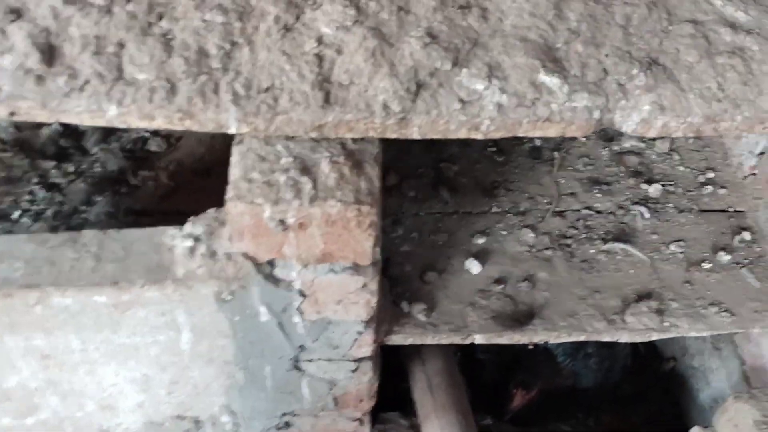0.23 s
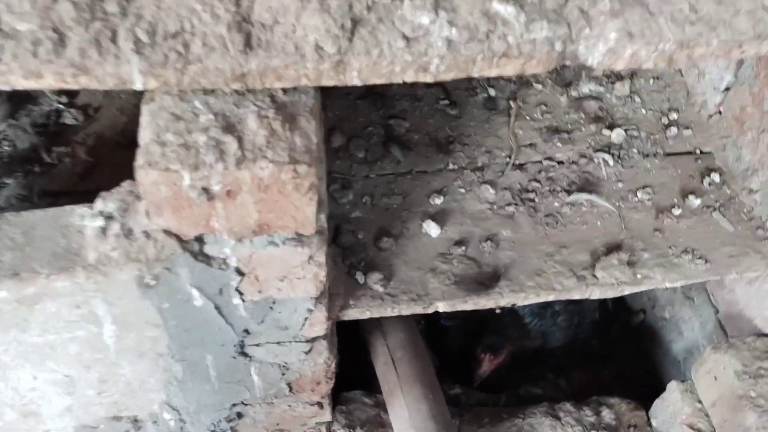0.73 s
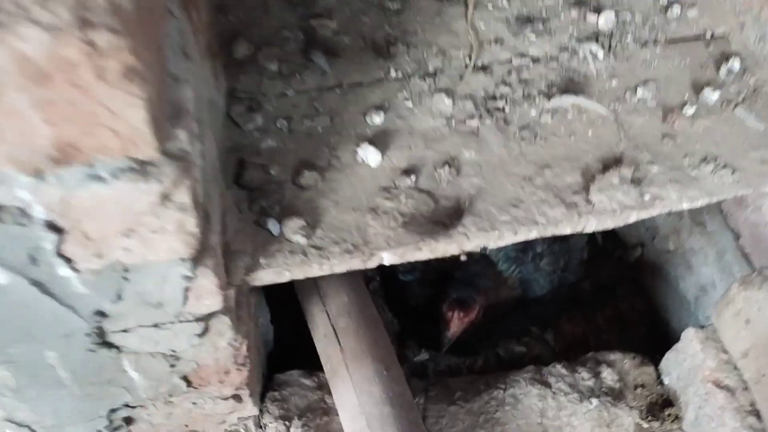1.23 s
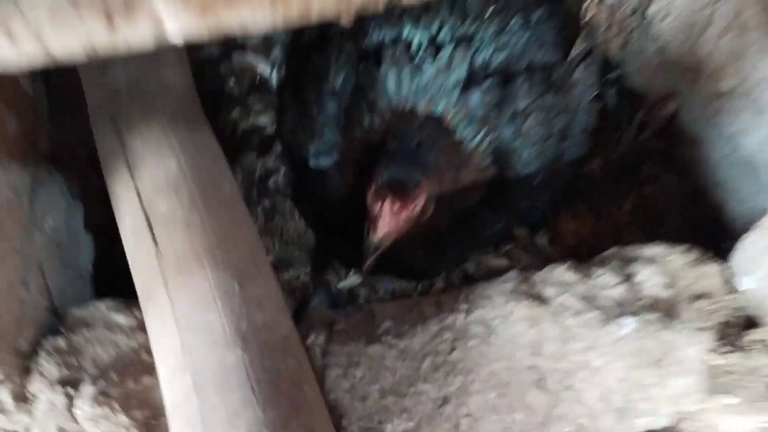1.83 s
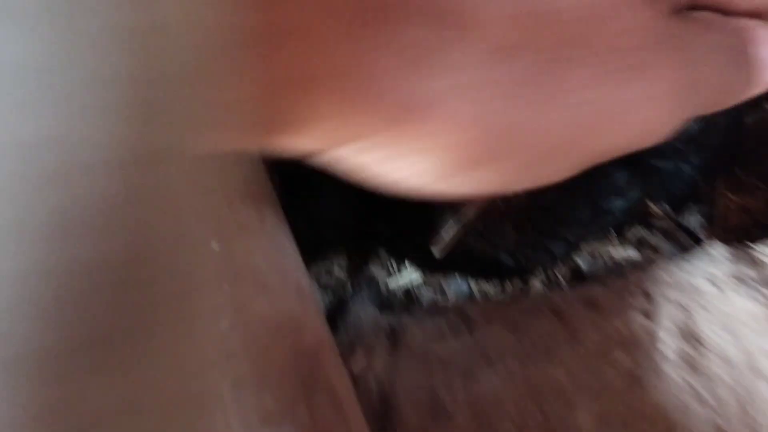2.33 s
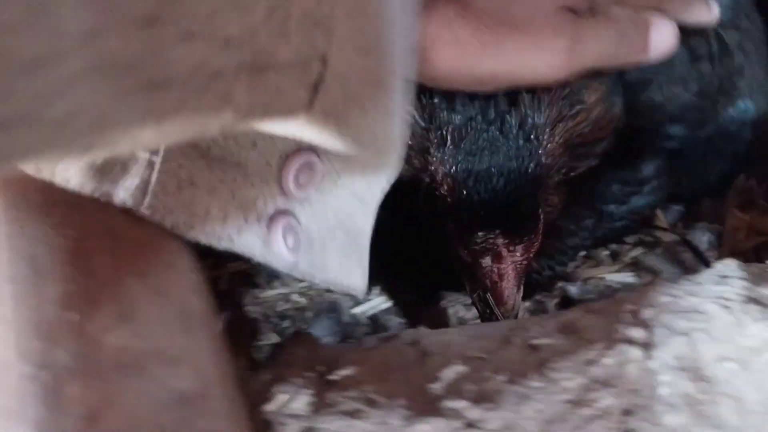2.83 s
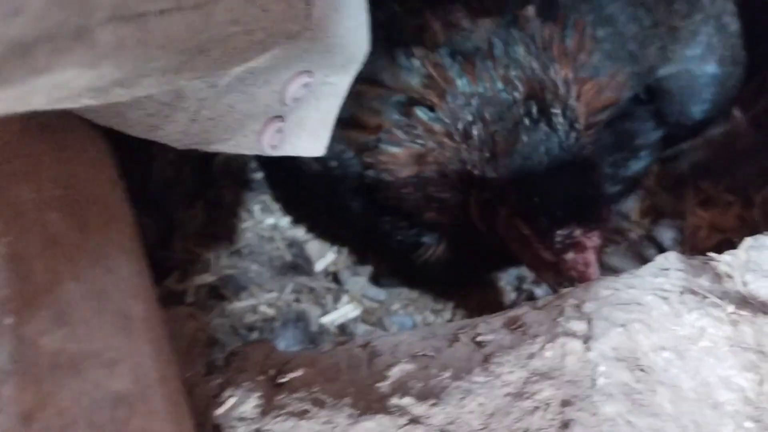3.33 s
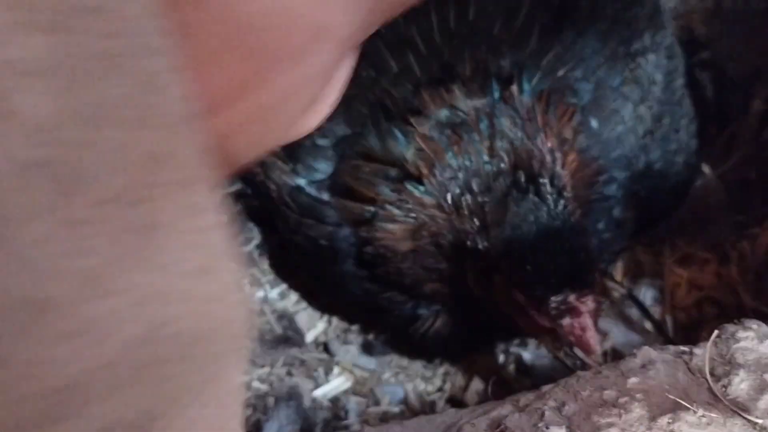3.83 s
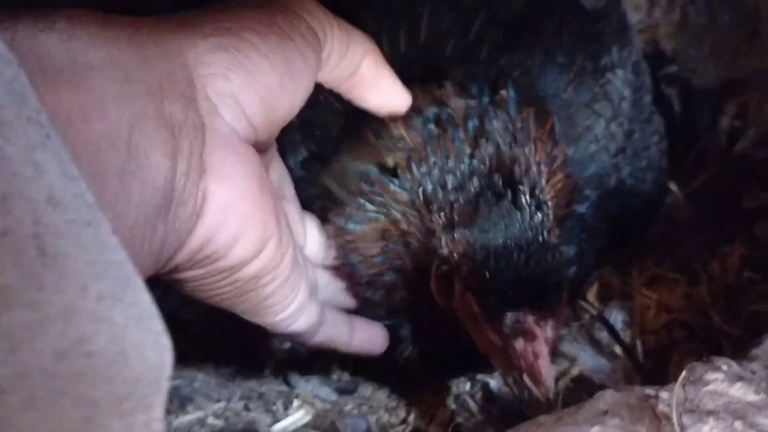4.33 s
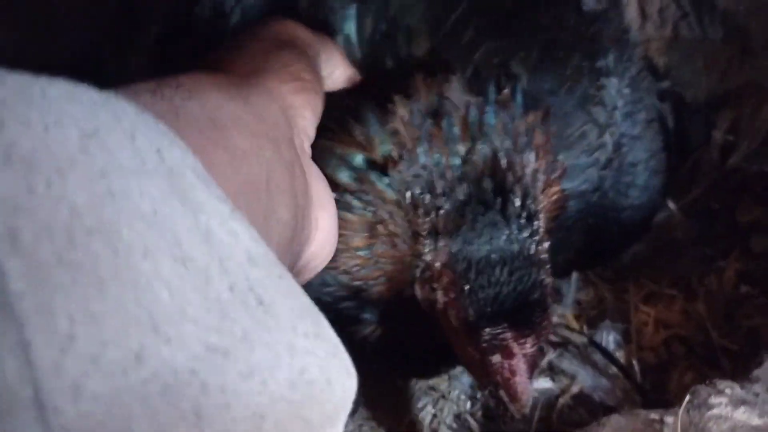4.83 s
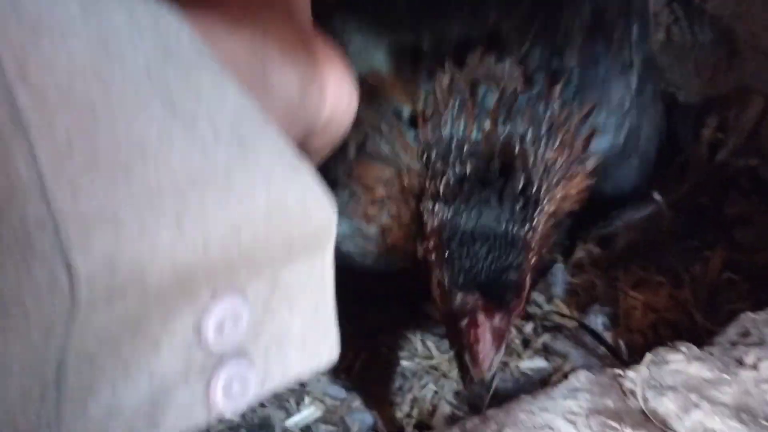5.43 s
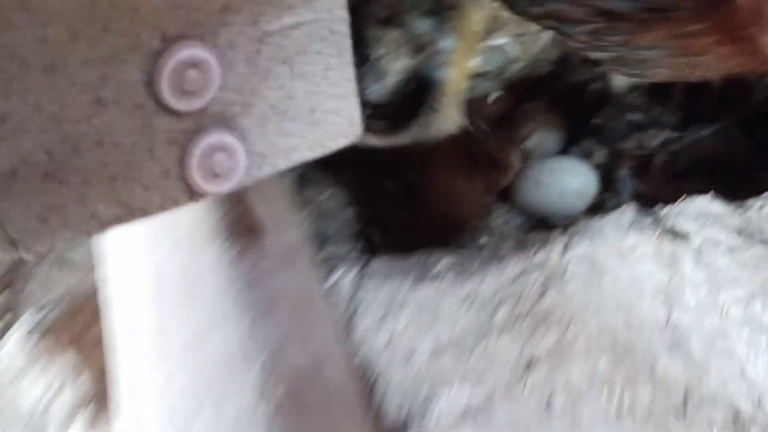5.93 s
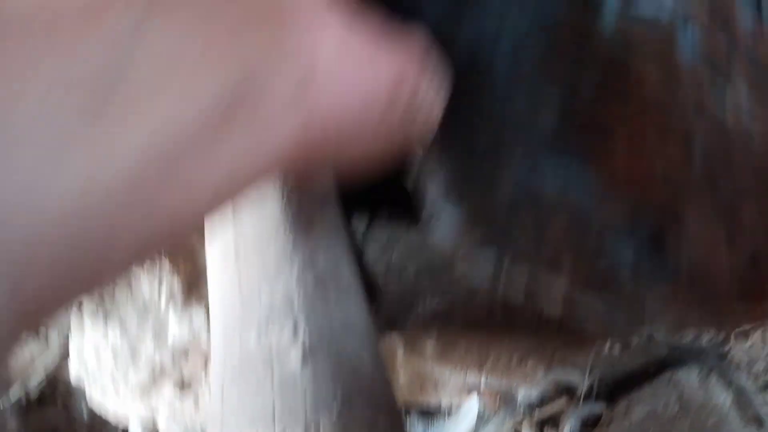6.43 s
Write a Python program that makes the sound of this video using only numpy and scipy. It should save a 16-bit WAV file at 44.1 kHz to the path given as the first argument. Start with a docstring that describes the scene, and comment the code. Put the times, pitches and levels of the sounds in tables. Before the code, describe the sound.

Quiet shed air and soft handling rumble. From 0 to 0.3 s a close hen gives a faint quavering grumble, around 900 Hz; a distant hen moans twice and peeps by 0.8 s. Dull scuffs and knocks on brick come at 0.85-1.4 s, as a thin trembling wail begins at 1.0. It swells from 1.5, holds near 1200-1300 Hz with little catches, peaks around 2.3-2.4 at 1400, then repeatedly cracks into a low, breathy, rasping squawk until 3.0. Bright two-part clucks strike at 3.16, 3.42 and 3.75, with straw snaps and rustle. Small clucks at 4.07 and 4.31 lead into a wavering growl to 4.7; lower clucks follow at 4.85 and 5.08. A wheezy growl swells from 5.3 to 5.9 as sleeve and straw drag loudly. Popping clucks at 6.03, 6.22 and 6.43 precede a final two-part cluck at 6.62. Close, dry stereo; loud calls duck the background.

```python
"""A brick nook in a shed: a hen on her nest gives a quavering grumble, a long wail breaking into a squawk,
then clucks and growls. Her voice is a harmonic tone whose pitch slips, with half-pitch lines when it roughens.
Shaped noise makes the reaching hand's rustle and rumble, scuffs, a dull throat pop, snaps and air;
a far hen is a wavering tone. The recorder's gain control ducks everything under loud calls."""
import sys
import numpy as np
from scipy import signal
from scipy.fft import rfft, irfft
from scipy.io import wavfile
from scipy.ndimage import uniform_filter1d, map_coordinates

SR = 44100
rng = np.random.default_rng(int(sys.argv[2]) if len(sys.argv) > 2 else 0)


def wav_out(sig):
    """Save sig, one row per channel (or a flat mono array), as 16-bit PCM at SR to the path in sys.argv[1]."""
    wavfile.write(sys.argv[1], SR, np.round(np.clip(np.atleast_2d(sig).T, -1, 1) * 32767).astype(np.int16))


N = 295029
TIME_S = np.arange(N) / SR

# Still air of the shed. Each row: frequency in Hz, relative level in dB.
AIR_SPECTRUM = [(40, -11.5), (100, 1), (250, -14), (700, -7.5), (1500, -39), (3300, -26.5), (4400, -47),
                (5500, -27), (8000, -33.5), (15000, -42)]
# Far fowl, two moans and a peep. Each row: start in seconds, length in seconds, pitch in Hz, level in dB
# before the far trim, fade over the call in dB.
FAR_CALL_ROWS = [(0.267, 0.24, 566, -42, 32.5), (0.477, 0.13, 537, -49.5, 7), (0.69, 0.16, 3255, -56.5, 17)]
# Far hen's throat. Each row: frequency in Hz, relative level in dB.
FAR_THROAT_SPECTRUM = [(500, 2), (1100, 12), (1650, -0.5), (2200, 4.5), (2800, -8), (3500, -4), (5000, -58),
                       (9000, -70)]
# Hand shifting on the microphone case. Each row: time in seconds, level in dB before the trim.
RUMBLE_LEVEL = [(0, -64), (.25, -53), (.9, -61.5), (1.5, -70), (2.1, -52), (2.8, -54.5), (3.08, -40.5),
                (4.25, -45), (5.1, -44), (6.69, -50)]
# Case rumble. Each row: frequency in Hz, relative level in dB.
RUMBLE_SPECTRUM = [(15, -59), (25, -29.5), (91, 2.5), (113, 8), (195, -2.5), (350, -14), (435, -4),
                   (565, -23), (793, -17.5), (912, -34), (1000, -49.5), (1300, -72.5), (2200, -120)]
# Sleeve dragging over the ledge as the hen is lifted. Each row: time in seconds, level in dB.
DRAG_LEVEL = [(5.3, -81), (5.7, -38), (5.97, -32.5), (6.25, -38.5), (6.69, -35.5)]
# Sleeve drag. Each row: frequency in Hz, relative level in dB.
DRAG_SPECTRUM = [(30, -54), (60, -23), (130, -1.5), (200, -2.5), (300, -9.5), (450, -10.5), (900, -34.5),
                 (3000, -73.5)]
# Scuffs and knocks on brick; the last row is a dull throat pop before the final cluck.
# Each row: start in seconds, level in dB, 60 dB decay in seconds, centre in Hz.
DULL_BURST_ROWS = [(0.2, -48, .04, 900), (0.846, -43, 0.18, 580), (0.923, -41, 0.72, 780),
                   (0.949, -32, 0.11, 806), (0.976, -37.5, 0.18, 500), (1.167, -43.5, 0.17, 700),
                   (1.193, -30.5, 0.15, 594), (1.384, -27, 0.021, 1610), (2.07, -29.5, 0.45, 710),
                   (6.591, -25, 0.026, 700)]
# Straws snapping. Each row: start in seconds, level in dB before the trim.
SNAP_ROWS = [(1.112, -31.5), (1.2887, -27.5), (1.3334, -26.5), (1.6084, -30), (2.7748, -21), (3.418, -41),
             (3.8144, -21), (4.048, -26)]
# Sleeve and feathers brushing straw. Each row: time in seconds, level in dB before the trim.
RUSTLE_LEVEL = [(0, -97), (.9, -76), (1.55, -59.5), (2.3, -64), (2.7, -47), (3.15, -57), (3.66, -54),
                (3.86, -50), (4.02, -57), (4.14, -74.5), (4.45, -71), (4.62, -59.5), (4.72, -55.5),
                (5.1, -70.5), (5.5, -60), (5.62, -46), (5.84, -41.5), (6.1, -51.5), (6.69, -55)]
# Rustle. Each row: frequency in Hz, relative level in dB.
RUSTLE_SPECTRUM = [(60, -35.5), (130, -15.5), (200, -5.5), (300, -8), (420, -7.5), (580, -14), (780, -7.5),
                   (1100, -10.5), (1500, -11.5), (2000, -6.5), (2700, -7.5), (3700, -9.5), (5200, -10.5),
                   (7700, -18), (10300, -25.5), (15000, -31.5)]
# Nook reverberation. Each row: frequency in Hz, 60 dB decay in seconds.
NOOK_T60 = [(200, 0.35), (1000, 0.25), (4000, 0.23), (12000, 0.027)]
# Hen before the microphone. Each row: time in seconds, lag of the left port in ms,
# left minus right in dB below the split, lag of the left port in the treble in ms.
HEN_PLACE = [(.1, .03, -1.6, .08), (1.1, .13, 0, .07), (1.7, .14, -1, .08), (2.0, .26, .3, .3),
             (2.6, .25, -.3, .3), (2.9, .2, -3.4, .29), (3.45, .24, -5.3, .31), (4.5, .31, -4.3, .34),
             (5.75, .29, -2.4, .28), (6.25, .11, -3, .13), (6.64, -.05, -1.3, .11)]
# Air hissing through the open beak. Each row: time in seconds, level in dB.
HISS_LEVEL = [(.25, -59), (.4, -62), (.9, -66), (1.0, -55), (1.48, -31), (1.8, -44), (2.48, -39),
              (2.64, -29), (2.94, -20), (3.03, -80)]
# Beak hiss. Each row: frequency in Hz, relative level in dB.
HISS_SPECTRUM = [(500, -45.5), (1100, -2.5), (1700, 13), (2400, -1.5), (3100, 0.5), (3900, -7), (4800, -4),
                 (7000, -22.5), (10000, -50.5), (15000, -49)]
# Wheeze of the low growl. Each row: time in seconds, level in dB.
WHEEZE_LEVEL = [(5.25, -89), (5.45, -44), (5.6, -25.5), (5.88, -16.5), (5.93, -70)]
# Wheeze. Each row: frequency in Hz, relative level in dB.
WHEEZE_SPECTRUM = [(600, -21.5), (1200, 8.5), (1700, -3), (2000, -33), (2900, -23), (3500, -5.5),
                   (4100, -25.5), (8000, -37.5)]
# Throat popping open. Each row: start in seconds, peak in dB before the trim, length in seconds.
POP_ROWS = [(3.142, -34, 0.0075), (3.395, -23, 0.0056), (3.714, -20, 0.0052), (4.049, -20.5, 0.015),
            (4.285, -30.5, 0.0065), (4.82, -24.5, 0.013), (5.059, -22, 0.015), (5.26, -31, 0.0052),
            (6.012, -7.5, 0.011), (6.195, -21, 0.006), (6.408, -18.5, 0.007)]
# Throat and beak. Each row: frequency in Hz, relative level in dB.
THROAT_SPECTRUM = [(800, 25), (1250, 32.5), (1700, 6.5), (2050, 17.5), (2450, 4), (3100, -12), (3800, 1.5),
                   (4300, -15.5), (5200, -12.5), (6800, -28), (8500, -33), (12000, -67.5)]
# Catches in the voice. Each row: centre in seconds, half length to 1/e in seconds,
# pitch drop as a share, level change in dB.
VOICE_SLIPS = [(1.062, 0.0067, 0.2, 16), (1.119, .008, 0.19, 17), (1.241, 0.0062, .09, 9),
               (1.294, 0.0087, .11, 13.5), (1.345, .012, .06, 15), (1.421, .007, .28, -1.5),
               (1.822, 0.0043, .12, -4), (2.048, 0.0056, 0.12, 1.5), (2.181, 0.0033, .2, -3.5),
               (2.198, .005, .24, -4.5), (2.785, 0.0027, .16, -1), (2.837, 0.0052, .28, 2),
               (2.853, 0.0047, 0.22, 6), (3.274, .009, 0.37, -5.5), (3.509, .004, 0.056, -3.5),
               (3.237, .007, 0.14, -8), (3.798, 0.0046, 0.12, 0), (4.368, 0.0043, 0.17, 2),
               (6.667, .005, 0.12, -11), (4.403, .009, .05, -28.5), (4.453, .007, 0.078, -39),
               (4.504, 0.0055, 0.057, -17.5), (4.583, 0.0045, 0.074, -10), (5.382, .0056, .4, 3.5),
               (5.43, .005, 0.64, -5.5)]
# Growls, long and short. Each row: start in seconds, length in seconds, pitch in Hz, starting level in dB,
# swell in dB, closing sag in seconds, quaver as a share of the pitch, undertone in dB, rasp in dB, overtones in dB.
GROWL_ROWS = [(0, 0.31, 909, -34, -4, .22, .12, -32, -21.5, -26.5),
              (4.366, 0.31, 911, -7.5, -6.5, .11, 0.083, -30.5, -29, -38),
              (5.34, 0.054, 910, -17.5, 5, .04, .08, -28, -22, -21.5),
              (5.389, 0.074, 880, -15, -7, 0.037, 0.077, -22, -16, -33),
              (5.451, .465, 871, -14.5, 11, 0.04, 0.035, -9, -16, -23),
              (6.237, 0.069, 838, -9, -4, .045, 0.052, -11, -17, -24)]
# Short clucks. Each row: start in seconds, length in seconds, landing pitch in Hz, level in dB, undertone in dB.
CLUCK_ROWS = [(4.069, .028, 520, -23.5, -14), (4.313, 0.026, 570, -15, -26),
              (4.849, 0.032, 444, -11.5, -16), (5.084, 0.031, 434, -14.5, -24),
              (5.286, 0.036, 873, -13, -9.5), (6.03, 0.033, 434, -6.5, -31.5),
              (6.221, 0.028, 850, -10, -18.5), (6.429, 0.041, 410.5, -11.5, -19)]
# Two-part clucks. Each row: start in seconds, note length in seconds, top pitch in Hz, mid-note level in dB,
# pause in seconds, tail length in seconds, tail level in dB.
BAWK_ROWS = [(3.164, 0.045, 1112, -3.5, 0.0011, 0.077, -12.5), (3.423, 0.045, 1113, 0, 0.0069, 0.081, -9.5),
             (3.746, .03, 1015, -2, 0.02, .085, -12), (6.62, 0.034, 944.4, -1, 0, .08, -7)]
# Long wail. Each row: time in seconds, pitch in Hz, level in dB, overtones in dB, quaver as a share of the pitch.
WAIL_PATH = [(1.0, 896, -35, -16, 0.045), (1.05, 1309, -41, -21, .055), (1.17, 1212, -33.5, -13, 0.068),
             (1.28, 1423, -32.5, -19.5, 0.035), (1.41, 1037, -27.5, -20.5, .06),
             (1.52, 1269, -20.5, -19, .05), (1.64, 1317, -13, -19.5, 0.013),
             (1.79, 1245, -10, -17.5, 0.011), (1.85, 1158, -20.5, -10, .035),
             (1.94, 1267, -12, -19, 0.0036), (2.01, 1213, -19.5, -13, 0.033),
             (2.05, 1203, -13.5, -14.5, 0.019), (2.23, 1224, -9.5, -22.5, 0.018),
             (2.33, 1415, 0, -17.5, 0.0081), (2.42, 1323, 1, -29, 0.0097), (2.54, 1205, -6, -13, .085),
             (2.68, 1178, -0.5, -31, .03), (2.77, 1230, -1, -23.5, 0.021), (2.83, 1381, -3.5, -14.5, 0.036)]
# Lopsided vibration in the wail. Each row: time in seconds, even against odd harmonics in dB.
WAIL_LOPSIDED = [(1.0, -11), (1.65, -12.5), (1.9, 1), (2.33, 0), (2.5, -2)]
# Wail breaking into a squawk. Each row: start in seconds, length in seconds, starting pitch in Hz,
# starting level in dB, rasp between the harmonics in dB.
WAIL_BREAKS = [(2.554, 0.052, 820, -3.5, 14.5), (2.617, .04, 783.6, -8, -17.5),
               (2.691, .062, 802, -6.5, -0.5), (2.864, 0.12, 847.6, 0.5, -18.5),
               (2.975, .034, 731, -8.5, 0)]


def amp(db):
    """Decibels to gain."""
    return 10 ** (np.asarray(db) / 20)


def unit(x):
    """Scales to rms 1."""
    return x / np.sqrt(np.mean(x ** 2) + 1e-20)


def read(points, hz):
    """Interpolates a spectrum on a log-frequency axis."""
    f, value = np.transpose(points)
    return np.interp(np.log(hz + 1), np.log(f + 1), value)


def follow(rows, t):
    """Each column of a curve at the times t."""
    s, *columns = np.transpose(rows)
    return [np.interp(t, s, c) for c in columns]


def level_gain(rows, trim_db=0):
    """Gain over the whole scene from a level curve."""
    return amp(follow(rows, TIME_S)[0] + trim_db)


def add(mix, s, sound):
    """Mixes a sound in at s seconds."""
    part = mix[..., max(round(s * SR), 0):][..., :sound.shape[-1]]
    part += sound[..., :part.shape[-1]]


def span(s, length_s):
    """Times from the start of a note, cut at the scene's end."""
    return np.arange(min(round(length_s * SR), N - round(s * SR))) / SR


def colour(x, points):
    """Filters by a spectrum; rms 1."""
    gains = amp(read(points, np.fft.rfftfreq(N, 1 / SR)))
    return unit(irfft(rfft(x) * gains, N))


def wobble(hz, octaves=.6):
    """Random motion at about hz cycles a second; rms 1."""
    f = np.fft.rfftfreq(N, 1 / SR) + 1e-3
    band = np.exp(-.5 * (np.log2(f / hz) / octaves) ** 2)
    return unit(irfft(rfft(rng.standard_normal(N)) * band, N))


def pair(x, likeness):
    """Two unrelated signals become a partly alike left and right."""
    c = np.clip(likeness, 0, 1)
    return np.array([x[0], c * x[0] + np.sqrt(1 - c ** 2) * x[1]])


def still_air(level_db=-60, likeness=0.64):
    """Steady coloured noise, partly alike at both ports."""
    return amp(level_db) * colour(pair(rng.standard_normal((2, N)), likeness), AIR_SPECTRUM)


def far_hen(waver=0.037, waver_hz=29.6):
    """Eight throat-shaped harmonics on a wavering pitch."""
    out, k = np.zeros(N), np.arange(1, 9)[:, None]
    bend = 1 + waver * wobble(waver_hz)
    for s, length_s, hz, top_db, fade_db in FAR_CALL_ROWS:
        t = s + span(s, length_s)
        db = top_db - fade_db * (t - s) / length_s
        phase = 2 * np.pi * np.cumsum(hz * np.interp(t, TIME_S, bend)) / SR
        gains = amp(read(FAR_THROAT_SPECTRUM, k * hz))
        wave = (gains * np.sin(k * phase)).sum(0)
        add(out, t[0], unit(wave) * amp(db) * signal.windows.tukey(len(t), .2))
    return out


def rumble(grip_trim_db=3, likeness=0.94):
    """Low noise of the grip and the dragging sleeve, nearly the same at both ports."""
    grip, cloth = (pair(rng.standard_normal((2, N)), likeness) for _ in range(2))
    grip = colour(grip, RUMBLE_SPECTRUM) * level_gain(RUMBLE_LEVEL, grip_trim_db)
    return grip + colour(cloth, DRAG_SPECTRUM) * level_gain(DRAG_LEVEL)


def dull_bursts(spread=1.32, lowpass_hz=3500, likeness=0.76):
    """Dull, decaying noise bursts: scuffs and knocks on brick, then one throat pop."""
    out = np.zeros((2, N))
    for s, db, decay_s, hz in DULL_BURST_ROWS:
        t = np.arange(0, decay_s, 1 / SR)
        band = signal.butter(1, [hz / spread, hz * spread], "band", fs=SR)
        burst = signal.lfilter(*band, pair(rng.standard_normal((2, SR)), likeness))
        burst = unit(signal.lfilter(*signal.butter(1, lowpass_hz, fs=SR), burst))[:, :len(t)]
        add(out, s, burst * amp(db - 60 * t / decay_s))
    return out


def snaps(trim_db=-4, decay_s=0.0098, highpass_hz=3000):
    """Each dry straw breaks with a bright tick of noise, 60 dB down after decay_s."""
    out, t = np.zeros((2, N)), np.arange(SR // 20) / SR
    for s, db in SNAP_ROWS:
        tick = signal.lfilter(*signal.butter(2, highpass_hz, "high", fs=SR), rng.standard_normal((2, len(t))))
        add(out, s, tick * amp(db + trim_db - 60 * t / decay_s))
    return out


def patchy(x, depth_db=3):
    """The colour shifts as different straws and folds of cloth take the load."""
    z = signal.stft(x, SR, nperseg=512)[2]
    patches = uniform_filter1d(rng.standard_normal(z.shape[1:]), size=9, axis=0)
    patches = unit(uniform_filter1d(patches, size=14, axis=1))
    return unit(signal.istft(z * amp(depth_db * patches), SR, nperseg=512)[1][:, :N])


def rustle(trim_db=14, grain_db=2.5, grains_per_s=2500, rub_db=-3, likeness=0.29):
    """Many tiny straw cracks over the smooth rub of cloth."""
    sizes = amp(grain_db * np.minimum(rng.exponential(1, (2, N)), 5))
    grains = sizes * (rng.random((2, N)) < grains_per_s / SR)
    cracks = unit(grains * rng.choice([-1, 1], (2, N)))
    drive = cracks + amp(rub_db) * rng.standard_normal((2, N))
    return colour(patchy(pair(drive, likeness)), RUSTLE_SPECTRUM) * level_gain(RUSTLE_LEVEL, trim_db)


def nook(x):
    """A short, dense noise tail off the close brick walls, decaying by frequency."""
    taps = rng.standard_normal((2, SR // 3)) * (np.arange(SR // 3) > SR // 250)  # 4 ms gap
    hz, t, z = signal.stft(taps, SR, nperseg=256)
    echoes = signal.istft(z * amp(-60 * t / read(NOOK_T60, hz)[:, None]), SR, nperseg=256)[1]
    return signal.fftconvolve(x[None], echoes / np.linalg.norm(echoes[0]), axes=1)[:, :N]


def ports(x, split_hz=1750):
    """Sound reaches the two ports at different times; the nook also makes the low tone stronger on one side."""
    low = signal.sosfiltfilt(signal.butter(4, split_hz, fs=SR, output="sos"), x)
    lag_ms, balance_db, treble_lag_ms = follow(HEN_PLACE, TIME_S)
    out = np.zeros((2, N))
    for band, band_lag_ms, tilt_db in (low, lag_ms, balance_db), (x - low, treble_lag_ms, 0):
        shift = band_lag_ms * SR / 2000  # half the lag on each side, in samples
        out += [map_coordinates(band, [np.arange(N) - side * shift], order=3) * amp(side * tilt_db / 2)
                for side in (1, -1)]
    return out


def hiss(tone, flutter_db=2, flutter_hz=37, gating=0.64):
    """Turbulent air escapes in puffs, in step with the tone."""
    puffs = 1 + gating * np.cos(np.angle(signal.hilbert(tone)))
    beak, wheeze = rng.standard_normal((2, N)) * puffs * amp(flutter_db * wobble(flutter_hz))
    return (colour(beak, HISS_SPECTRUM) * level_gain(HISS_LEVEL)
            + colour(wheeze, WHEEZE_SPECTRUM) * level_gain(WHEEZE_LEVEL))


def pops(start_hz=400, end_hz=1000, trim_db=5, rise_s=0.00069, damping=1.4):
    """A few cycles that sweep upward as the throat opens."""
    out = np.zeros(N)
    for s, db, length_s in POP_ROWS:
        t = np.arange(0, length_s, 1 / SR)
        phase = 2 * np.pi * np.cumsum(start_hz + (end_hz - start_hz) * t / length_s) / SR
        edges = np.minimum(t / rise_s, 1) * np.minimum((length_s - t) / rise_s, 1)
        shape = edges * np.exp(-damping * t / length_s)
        add(out, s, amp(db + trim_db) * shape / shape.max() * np.sin(phase))
    return out


def unsteadiness(quaver_per_s=55, quaver_wander=.22):
    """What all calls share: a quaver made of quick dips, fine jitter, flutter, grit and scattered cycle timing."""
    turns = np.cumsum(quaver_per_s * (1 + quaver_wander * wobble(25))) / SR
    dips = np.cos(np.pi * turns) ** 4
    return np.array([unit(dips - dips.mean()), wobble(220), wobble(50), wobble(200), wobble(130, 1)])


def reed(shake, s, hz, level_db, quaver, over_db, under_db, half_db, even_db, fade_s=.003,
         jitter_share=.0015, jitter_per_quaver=.15,
         flutter_db_per_quaver=63, flutter_max_db=4, grit_db_per_quaver=5):
    """A tone, throat-shaped harmonics, and half lines where the cycles alternate and lose their timing."""
    t = s + np.arange(len(hz)) / SR
    dips, jitter, flutter, grit, scatter = shake[:, max(round(s * SR), 0):][:, :len(t)]
    hz = hz * (1 - quaver * dips + (jitter_share + jitter_per_quaver * quaver) * jitter)
    flutter_db = np.minimum(flutter_db_per_quaver * quaver, flutter_max_db) * flutter
    level_db = level_db + flutter_db + grit_db_per_quaver * quaver * grit
    for at_s, half_s, drop, change_db in VOICE_SLIPS:
        slip = np.exp(-np.minimum(((t - at_s) / half_s) ** 2, 20))
        hz, level_db = hz * (1 - drop * slip), level_db + change_db * slip
    phase = 2 * np.pi * np.cumsum(hz) / SR
    phase = phase + .22 * np.minimum(amp(half_db + 6), 1) * scatter  # radians

    k = np.arange(2, 11)[:, None]
    gains = amp(read(THROAT_SPECTRUM, k * hz) + even_db * (k % 2 == 0))
    overtones = (gains * np.cos(k * phase)).sum(0) / np.linalg.norm(gains, axis=0)
    gains = amp(read(THROAT_SPECTRUM, (k - .5) * hz) - 8.9 * np.log2(k - 1))
    rasp = (gains * np.cos((k - .5) * phase)).sum(0) / np.linalg.norm(gains, axis=0)

    shares = amp(np.broadcast_arrays(0 * t, over_db, under_db, half_db))
    parts = [np.sin(phase), overtones, np.sin(phase / 2), rasp]
    wave = (shares * parts).sum(0) / np.linalg.norm(shares, axis=0)
    fade = np.clip(np.minimum(t - s, t[-1] - t) / fade_s, 0, 1)
    return s, np.sqrt(2) * wave * fade * amp(level_db)


def growl(shake, s, length_s, hz, db, swell_db, sag_s, quaver, under_db, rasp_db, over_db,
          closing_db=9, sag_share=.2, drift_share=0.015):
    """A quavering note that drifts, then sags and roughens as the throat closes."""
    t = span(s, length_s)
    closing = np.clip(1 - (length_s - t) / sag_s, 0, 1)
    rough_db = closing_db * closing
    drift = drift_share * wobble(9)[:len(t)]
    return reed(shake, s, hz * (1 + drift - sag_share * closing), db + swell_db * t / length_s, quaver,
                over_db + rough_db, under_db + rough_db, rasp_db + rough_db, even_db=28, fade_s=0.017)


def cluck(shake, s, length_s, landing_hz, db, under_db, top_hz=1499, fall_s=0.018, rise_s=0.0097, rise_db=24.5):
    """The pitch plunges to its landing note while the sound swells."""
    t = span(s, length_s)
    hz = np.maximum(top_hz * np.exp(-t / fall_s), landing_hz)
    opening = np.minimum(t / rise_s, 1)
    return reed(shake, s, hz, db - rise_db * (1 - opening), quaver=0.046, over_db=-3 - 17.3 * np.log2(hz / 420),
                under_db=under_db, half_db=-14, even_db=12.5, fade_s=0.0065)


def clear_note(shake, s, length_s, hz, db, peak_share=0.33, arch=0.38, swell_db=7.5):
    """First part of a two-part cluck: a nearly pure tone that arches in pitch and swells."""
    u = span(s, length_s) / length_s
    return reed(shake, s, hz * (1 - arch * (u - peak_share) ** 2), db + swell_db * (u - .5), quaver=0.013,
                over_db=-24.5, under_db=-49.5, half_db=-47, even_db=-5.5, fade_s=0.0036)


def tail(shake, s, length_s, db, start_hz=850, sag_hz_per_s=430, quaver=0.094, roughening_db=10):
    """Second part of a two-part cluck: quavering, and rougher as it sinks."""
    t = span(s, length_s)
    rough_db = roughening_db * t / length_s
    return reed(shake, s, start_hz - sag_hz_per_s * t, db, quaver,
                over_db=rough_db - 29.5, under_db=rough_db - 46, half_db=rough_db - 29, even_db=4, fade_s=0.0015)


def wail(shake, under_db=-54, rasp_db=-41, break_under_db=-27, blend_s=0.012, sag_hz_per_s=880,
         fade_db_per_s=107, break_over_db=2, dulling_db_per_s=116.5, break_quaver=.024):
    """A long high call; toward its end it keeps dropping into the low register, where it sags and dulls."""
    s = WAIL_PATH[0][0]
    t = s + span(s, WAIL_BREAKS[-1][0] + WAIL_BREAKS[-1][1] - s)
    hz, level_db, over_db, quaver = follow(WAIL_PATH, t)
    state = np.array(np.broadcast_arrays(hz, level_db, quaver, over_db, under_db, rasp_db))
    for start_s, length_s, low_hz, db, harsh_db in WAIL_BREAKS:
        age_s = np.clip(t - start_s, 0, length_s)
        inside = np.clip(np.minimum(t - start_s, start_s + length_s - t) / blend_s + .5, 0, 1)
        low = np.array(np.broadcast_arrays(
            low_hz - sag_hz_per_s * age_s, db - fade_db_per_s * age_s, break_quaver,
            break_over_db - dulling_db_per_s * age_s, break_under_db, harsh_db))
        state = state + inside * (low - state)
    return reed(shake, s, *state, follow(WAIL_LOPSIDED, t)[0], fade_s=0.0099)


def voice():
    """All voiced calls of the near hen, sharing one unsteadiness."""
    out, shake = np.zeros(N), unsteadiness()
    for row in GROWL_ROWS:
        add(out, *growl(shake, *row))
    for row in CLUCK_ROWS:
        add(out, *cluck(shake, *row))
    for s, length_s, hz, db, pause_s, tail_s, tail_db in BAWK_ROWS:
        add(out, *clear_note(shake, s, length_s, hz, db))
        add(out, *tail(shake, s + length_s + pause_s, tail_s, tail_db))
    add(out, *wail(shake))
    return out


def scene(wet_db=-25, far_db=-2, far_wet_db=-3):
    """Still air, far hen, reaching hand and near hen."""
    far, tone = far_hen(), voice()
    hen = tone + pops() + hiss(tone)
    echoes = nook(amp(wet_db) * hen + amp(far_wet_db) * far)
    others = still_air() + amp(far_db) * far + rumble() + dull_bursts() + snaps() + rustle()
    return others + echoes + ports(hen)


def gain_control(x, threshold_db=-38, squeeze=0.44, recovery_db_per_s=170):
    """Turns down almost at once above the threshold and recovers at a steady rate in dB."""
    power_db = 10 * np.log10(abs(uniform_filter1d((x ** 2).mean(0), size=400)) + 1e-12)
    fall_db = recovery_db_per_s * TIME_S
    held_db = np.maximum.accumulate(power_db + fall_db) - fall_db
    over_db = np.maximum(held_db - threshold_db, 0)
    return x * amp(-squeeze * uniform_filter1d(over_db, size=150))


def record(dry, edge_hz=15600):
    """The recorder's gain control and band limit."""
    lowpass = signal.firwin(511, edge_hz, window=("kaiser", 9), fs=SR)
    return signal.oaconvolve(gain_control(dry), lowpass[None], "same")


dry = scene()
out = record(dry)
wav_out(out)
```